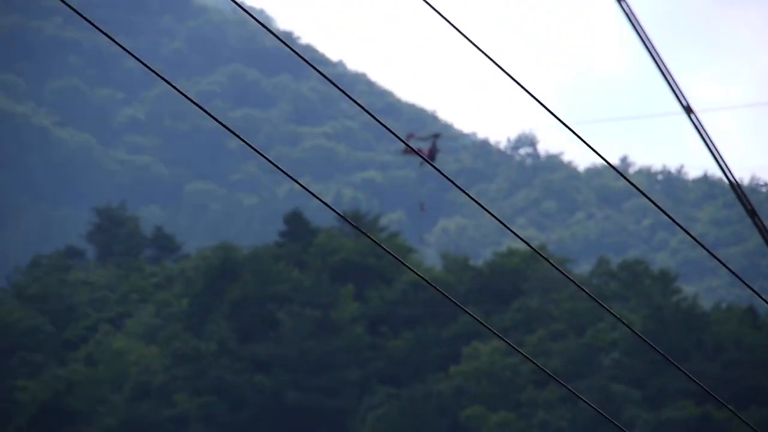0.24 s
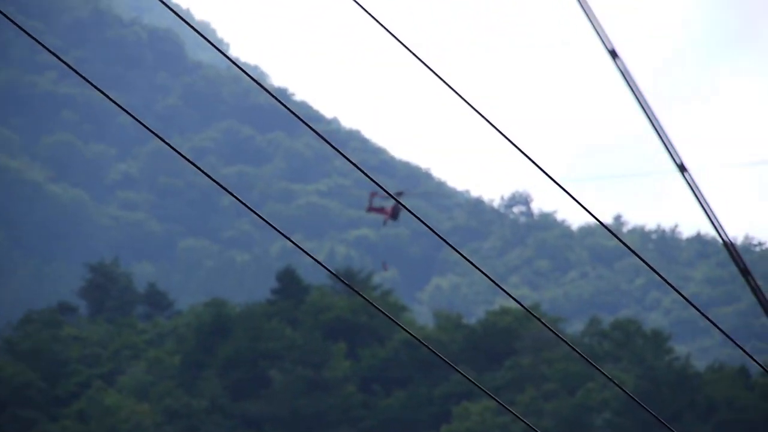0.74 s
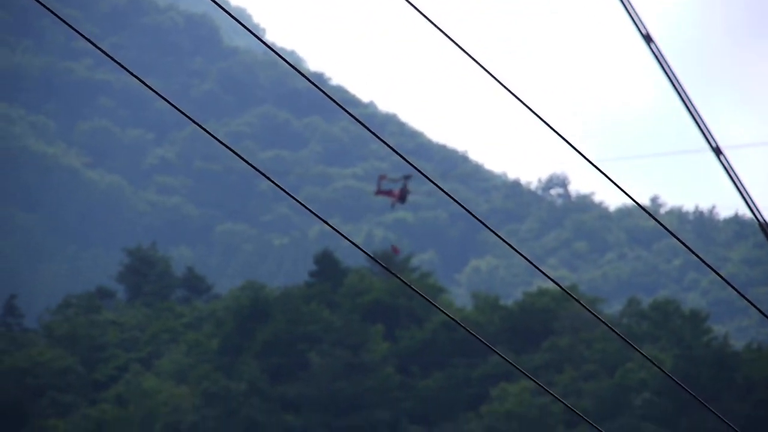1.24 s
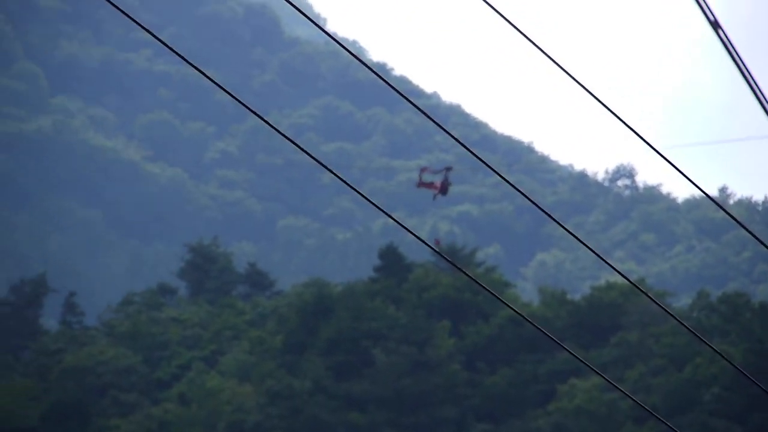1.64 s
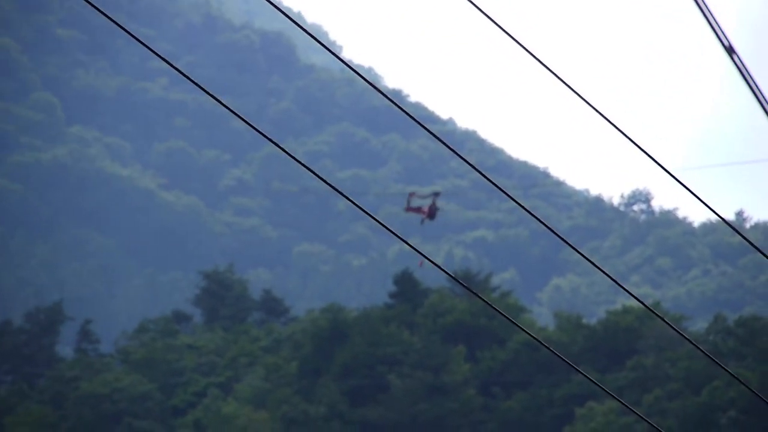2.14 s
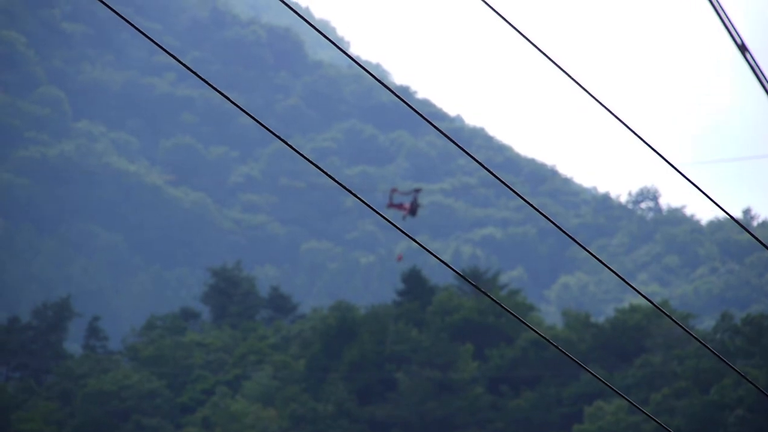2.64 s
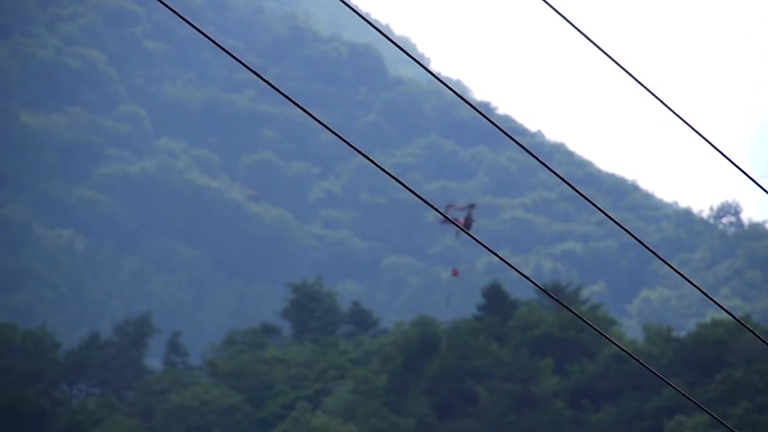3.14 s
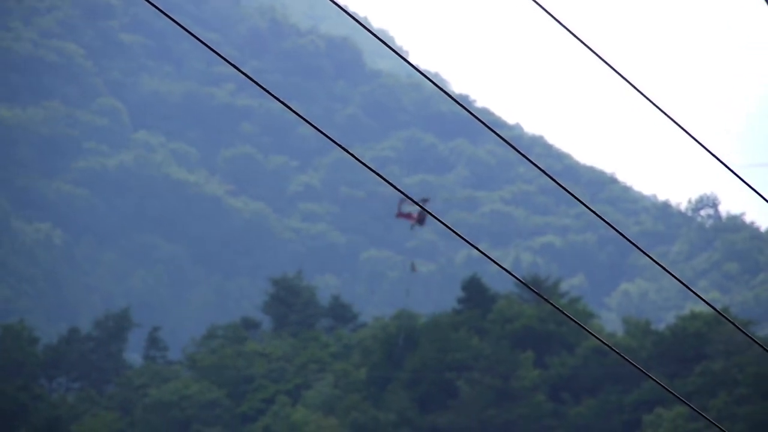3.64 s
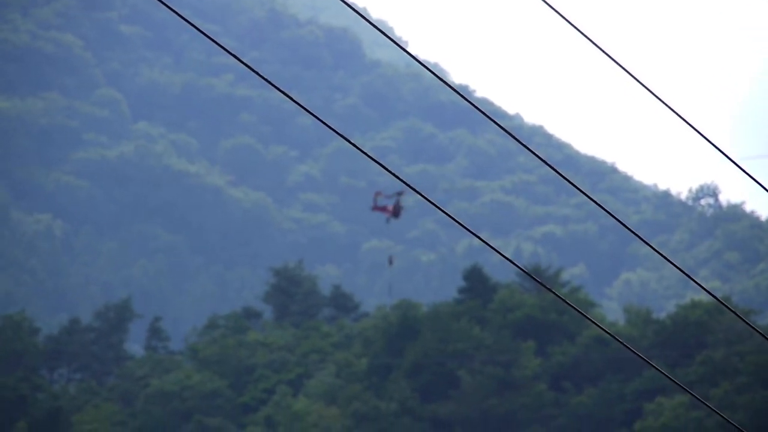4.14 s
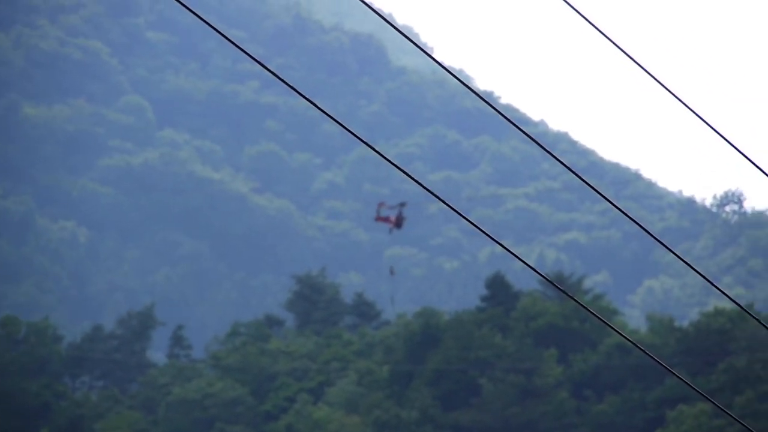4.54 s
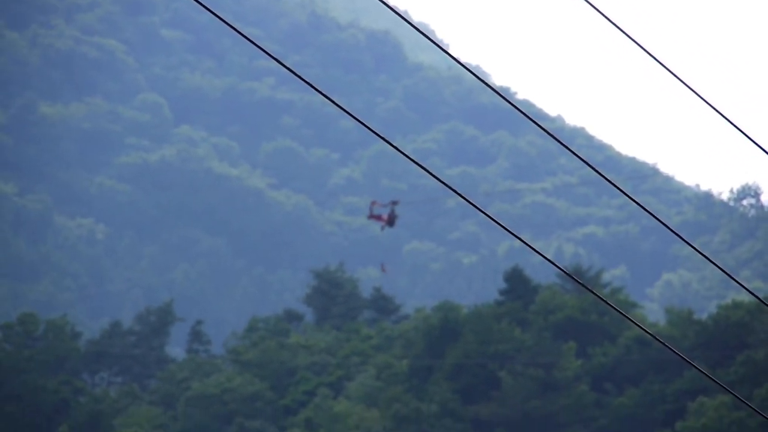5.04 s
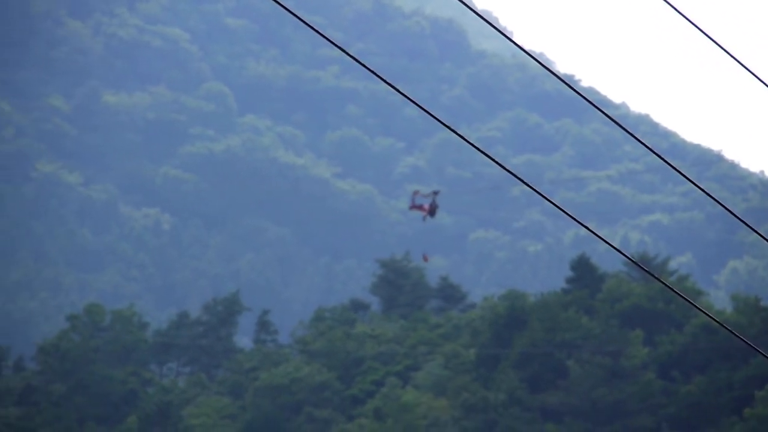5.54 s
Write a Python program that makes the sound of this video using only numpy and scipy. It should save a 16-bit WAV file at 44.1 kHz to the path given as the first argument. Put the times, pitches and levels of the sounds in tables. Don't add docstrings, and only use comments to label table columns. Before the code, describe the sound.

A diesel winch engine labours steadily close to the right, booming and roaring with a high pump whine, ticking valves and occasional loose metal clanks.

```python
import sys
import numpy as np
from scipy import signal
from scipy.fft import rfft, irfft
from scipy.io import wavfile

SR = 44100
rng = np.random.default_rng(int(sys.argv[2]) if len(sys.argv) > 2 else 0)


def pcm_store(signal):
    levels = np.round(np.clip(np.atleast_2d(signal), -1, 1) * 32767)
    wavfile.write(sys.argv[1], SR, levels.astype(np.int16).T)


def magnitude_from_level(level_db):
    exponent = np.asarray(level_db, float) / 20
    return 10 ** exponent


N = 255780
T = np.arange(N) / SR

# start_s, firing_hz
ENGINE_SPEED = [(0.0, 81.264), (1.16, 82.026), (2.32, 82.897), (3.48, 83.566), (4.64, 83.774),
                (5.8, 83.944)]
# start_s, level_db
WINCH_LOAD = [(0.0, 1.1), (0.53, 0.4), (0.74, 2.5), (0.83, 0.7), (1.37, 1.4), (1.45, 0), (1.95, 0.5),
              (2.44, 0.5), (2.55, -0.5), (2.61, 0.5), (3.56, -0.5), (3.85, 1.5), (4.09, -0.6), (4.35, 1.3),
              (4.89, -0.25), (5.34, -0.0), (5.48, 1), (5.8, 1)]
# crank_order (multiple of turn rate), level_db
EXHAUST_THUMP = [(2, -56.5), (4, -42), (5, -51), (7, -47), (11, -56.5), (12, -43.5), (13, -43), (14, -51),
                 (15, -50.5), (16, -42), (17, -51.5), (18, -38.5), (19, -46.5), (20, -52), (21, -45),
                 (24, -49), (25, -48)]
# crank_order (multiple of turn rate), level_db
BLOCK_KNOCK = [(28, -75), (29, -51.5), (31, -40), (32, -49.5), (33, -44), (34, -58.5), (35, -40),
               (36, -67.5), (38, -50), (39, -68), (56, -52.5), (58, -47), (61, -49), (63, -57), (89, -47),
               (91, -76.5), (123, -52.5)]
# pitch_hz, level_db (per Hz)
ROAR_COLOUR = [(30, -30), (50, -22.5), (70, -3.5), (130, -1.5), (220, -3.5), (300, -0.5), (380, 5.5),
               (460, 5), (560, -0.8), (730, -2.5), (850, 5.5), (980, 1.5), (1250, -2), (1500, 1.5)]
# pitch_hz, level_db (per Hz)
CLATTER_COLOUR = [(1500, -2.5), (1800, -1), (2150, -5), (2700, -3), (3300, -8.5), (4000, -14), (4600, -8),
                  (5200, -12), (5700, -18), (6500, -17), (7400, -23), (7800, -24.5), (9500, -35),
                  (10400, -48)]
# pitch_hz, level_db (per Hz)
FIZZ_COLOUR = [(4500, -48.5), (5700, -16), (6500, -14.5), (7400, -15.5), (7800, -25), (9500, -28.5),
               (10400, -44.5)]
# pitch_hz, t60_s, level_db
BLOCK_MODES = [(414, 0.022, -38.5), (644, 0.036, -36.5), (913, 0.048, -33), (1010, 0.027, -28),
               (1460, 0.013, -36.5), (1895, 0.018, -37)]
# pitch_hz, t60_s, level_db
COVER_MODES = [(3020, 0.0081, -46.5), (3760, 0.015, -45.5), (4030, 0.0093, -33.5), (4400, 0.028, -39),
               (5600, 0.0062, -34), (6710, 0.013, -42), (7420, 0.017, -44.5), (8700, 0.02, -50)]
# start_s, peak_db
HARD_TICKS = [(0.048, -30), (0.16, -31), (0.235, -23.5), (0.382, -24), (0.5287, -29), (0.602, -29),
              (1.042, -29), (1.0784, -24), (1.2979, -27), (1.7355, -28), (1.918, -27), (1.9899, -26),
              (2.0268, -33), (2.1715, -25), (2.3161, -27), (2.7856, -28), (2.822, -26), (3.0744, -27.5),
              (3.29, -25), (3.7209, -28), (3.8637, -30), (4.2582, -24), (4.4024, -32), (4.5093, -31),
              (5.2609, -28), (5.3702, -24.5), (5.44, -23), (5.4764, -26), (5.5473, -26)]
# start_s, peak_db, pitch_hz
HARD_TAPS = [(0.138, -34, 4230), (0.1607, -26, 3800), (1.276, -32, 4150), (1.8347, -32, 4180),
             (1.8951, -26, 4230), (1.9799, -25, 4020), (2.161, -27, 3910), (2.836, -30, 3890),
             (2.9926, -27, 3890), (3.0879, -34, 4150), (4.3081, -24, 3870), (4.344, -28, 4360),
             (4.5116, -24.5, 4120), (5.1437, -30, 4130), (5.167, -25, 4400), (5.3467, -40, 4090),
             (5.4784, -28, 3930), (5.562, -27, 3960), (5.597, -32, 3900)]
# start_s, peak_db
DRY_SNAPS = [(0.0523, -36), (0.615, -37), (0.7233, -33), (0.7891, -32), (3.1857, -40), (3.5324, -41),
             (3.83, -36), (3.8671, -32), (4.1769, -37), (4.2248, -40), (4.4608, -35), (4.6084, -33),
             (4.6389, -34), (4.6773, -32), (5.228, -39), (5.5264, -34)]
# start_s, peak_db, tilt_db (high modes up, low mode down)
PANEL_CLANKS = [
    (0.083, -23.5, 10),
    (0.21, -23, -2),
    (0.3404, -14, -2),
    (1.5914, -32, -6),
    (2.5002, -25, 9),
    (3.0086, -19.5, -1),
    (4.153, -20, -2.5),
    (4.6905, -19, -4.5),
    (5.1465, -22, 5),
    (5.4838, -15.5, 0),
]
# pitch_hz, half_width_hz, gain_db
PIPE_RESONANCES = [(162.6, .8, -9), (165.7, .5, -8), (167.7, 1.5, 8.3), (244.8, 1.9, 3.2)]
# pitch_hz, half_width_hz, gain_db
CASING_RESONANCES = [(842, 6.5, 10.5), (1638, 6, 0), (1668, 20, -4), (3266, 11, 18)]
PUMP_TONES = [-45.5, -43, -61.5]
# start_s, level_db
PUMP_WHINE = [(0.0, -38), (0.41, -33.5), (0.7, -35), (1.01, -34.5), (1.71, -38.5), (1.86, -30),
              (2.44, -33.5), (2.5, -37.5), (2.98, -35.5), (3.84, -35.5), (3.98, -33), (4.29, -33.2),
              (4.55, -36.5), (4.82, -34.0), (5.47, -37.6), (5.8, -34.5)]
# pitch_hz, direct_share (signed), lead_rad, other_face_db
FAR_MICROPHONE = [(30, 0.95, 0.18, -11.5), (200, 1.105, 0.14, -26), (600, 0.89, 0.19, -5),
                  (1270, 0.73, 0.36, -10.5), (1980, 0.31, .4, -16), (2550, 0.22, .4, -19),
                  (3260, -0.13, .2, -6.5), (4000, 0.28, 0.13, -16), (4450, -0.45, 0.032, -12),
                  (5200, 0.0022, 0.17, -10), (5700, -0.3, 0.12, -9), (6660, -0.18, 0, -17),
                  (8000, -0.14, 0.01, -6.5), (9300, -0.11, 0.0098, -18)]


def walk(rate):
    levels = rng.standard_normal(600)
    return 0.66 * np.interp(T * rate, np.arange(len(levels)), levels)


def along(table, column):
    hz = np.maximum(np.arange(N // 2 + 1) * SR / N, 1)
    values = np.array(table)
    return np.interp(np.log(hz), np.log(values[:, 0]), values[:, column])


def hiss(colour, gate, db):
    spectrum = rfft(rng.standard_normal(N) * gate)
    return magnitude_from_level(db) * irfft(spectrum * magnitude_from_level(along(colour, column=1)), N)


def tone(cycles, db):
    return np.sqrt(2) * magnitude_from_level(db) * np.cos(2 * np.pi * cycles)


def ring(blows, hz, t60):
    pole = np.exp(2j * np.pi * hz / SR - np.log(1000) / (t60 * SR))
    return signal.lfilter([1], [1, -pole], blows).imag


def blows_at(cycles, scatter_db):
    at = np.flatnonzero(np.diff(np.floor(cycles)))
    strength, lateness = rng.standard_normal((2, len(at)))
    late = (30 * abs(lateness)).astype(int)
    out = np.zeros(N)
    out[np.minimum(at + late, N - 1)] = magnitude_from_level(scatter_db * np.clip(strength, -2, 2))
    return out


def struck(events, t60, rise_s, gain_db):
    out = np.zeros(N + SR)
    t = T[:SR // 5]
    shape = (1 - np.exp(-t / rise_s)) * np.exp(-np.log(1000) * t / t60)
    for start_s, db, hz in events:
        out[int(start_s * SR):][:len(t)] += magnitude_from_level(db + gain_db) * shape * np.sin(2 * np.pi * hz * t)
    return out[:N]


def through(resonances, hz, db):
    lift = 1
    for centre, half_width, gain_db in resonances:
        lift = lift + magnitude_from_level(gain_db) / (1 + ((hz - centre) / half_width) ** 2)
    return db + 20 * np.log10(lift)


def loose_panel():
    low_blows = [(s, db - tilt_db, 1530) for s, db, tilt_db in PANEL_CLANKS]
    clank = struck(low_blows, 0.07, 0.0041, -1)
    for hz, gain_db in ((1800, -11.5), (2010, -6.5)):
        high_blows = [(s, db + tilt_db, hz) for s, db, tilt_db in PANEL_CLANKS]
        clank += struck(high_blows, 0.12, 0.0035, gain_db)
    shake = sum(magnitude_from_level(db) * np.exp(-((T - s - .008) / 0.003) ** 2) for s, db, _ in PANEL_CLANKS)
    rattle_colour = [(700, -24.0), (1100, -9.0), (2200, 1.5), (3200, -12), (4500, -31.5)]
    return clank + hiss(rattle_colour, shake, 1.5)


def injector_snap(firing):
    blows = magnitude_from_level(-26.5) * blows_at(firing - .45, 7.0)
    hard_at = [int(s * SR) for s, _ in DRY_SNAPS]
    blows[hard_at] += magnitude_from_level(np.array(DRY_SNAPS)[:, 1] + 23.5)
    t = T[:SR // 100]
    crack = rng.standard_normal(len(t)) * np.exp(-t / 0.0021)
    clicks = np.convolve(blows, crack)[:N]
    return irfft(rfft(clicks) * magnitude_from_level(along(FIZZ_COLOUR, column=1) + 6.5), N)


def valve_gear(firing):
    taps = struck(HARD_TAPS, 0.012, 0.00064, 6.0)
    for hz, t60, db in COVER_MODES:
        taps += magnitude_from_level(db) * ring(blows_at(firing - .45, 4.5), hz, t60)
    lift = blows_at(firing / 3 - .455, 4.1)
    tappet = magnitude_from_level(-35.5) * ring(lift, 4900, 0.011) + magnitude_from_level(-35.0) * ring(lift, 5300, 0.013)
    upper = [(s, db, 4980 + 100 * rng.standard_normal()) for s, db in HARD_TICKS]
    lower = [(s, db, hz * .93) for s, db, hz in upper]
    hard = struck(upper, 0.0098, 0.00094, 10.7) + struck(lower, 0.0082, 0.00083, 6.6)
    return taps + tappet + hard


def combustion(firing):
    rap = blows_at(firing - .5, 3.2)
    return sum(magnitude_from_level(db + 4.9 * walk(40)) * ring(rap, hz, t60) for hz, t60, db in BLOCK_MODES)


def engine_block(firing, faces):
    effort_db = np.interp(T, *np.transpose(WINCH_LOAD))
    puff = np.cos(2 * np.pi * (firing - .56))
    roar_db = (1.0 + 1.2 * walk(40)) * puff + 0.65 * walk(20) + 0.33 * walk(5.2) + 0.58 * effort_db
    clatter_db = (0.5 + 0.63 * walk(40)) * puff + 1.23 * walk(14) + 0.89 * effort_db
    fizz_db = (0.5 + 1.5 * walk(50)) * puff + 3.5 * walk(14) + 1.6 * effort_db
    noises = []
    for _ in range(faces):
        roar = hiss(ROAR_COLOUR + [(1700, -41)], magnitude_from_level(roar_db), -17)
        clatter = hiss([(1300, -45)] + CLATTER_COLOUR, magnitude_from_level(clatter_db), -17.0)
        fizz = hiss(FIZZ_COLOUR, magnitude_from_level(fizz_db), -22.5)
        noises.append(roar + clatter + fizz)
    return noises


def pump(firing, hz):
    first, second, fourth = (through(CASING_RESONANCES, 10 * k * hz, db) + 0.53 * walk(6.5)
                             for k, db in zip((1, 2, 4), PUMP_TONES))
    third = np.interp(T, *np.transpose(PUMP_WHINE))
    whine = np.zeros(N)
    for k, db in enumerate([first, second, third, fourth], start=1):
        whine += tone(10 * k * firing + .055 * walk(25), db + 1.13 * walk(30))
    return whine


def uneven_cylinders(orders, turn):
    out = np.zeros(N)
    for k, db in orders:
        cycles = k * turn + 0.11 * rng.standard_normal() + 0.084 * walk(6)
        out += tone(cycles, db + 3.0 * walk(7))
    return out


def exhaust(firing, hz):
    octave_db = through(PIPE_RESONANCES, 2 * hz, -38.5)
    third_db = through(PIPE_RESONANCES, 3 * hz, -45) + 2.0 * walk(4.6)
    boom = tone(firing, -20.5 + 0.51 * walk(9.2))
    boom -= tone(2 * firing, octave_db + 0.077 * walk(12))
    return boom + tone(3 * firing - .11, third_db)


def firing_count(hz):
    first_crest_s, period_s, swing_cycles = 2.92, .66, .014
    since_crest = T - first_crest_s
    fade_in = np.clip(since_crest + period_s / 2, 0, period_s / 2) * 2 / period_s
    hunt = fade_in * np.cos(2 * np.pi * since_crest / period_s)
    return .232 + np.cumsum(hz) / SR + swing_cycles * hunt


def scene():
    hz = np.interp(T, *np.transpose(ENGINE_SPEED))
    firing = firing_count(hz)
    turn = firing / 3
    front, back = engine_block(firing, faces=2)
    ticks = valve_gear(firing)
    near = loose_panel() + injector_snap(firing) + ticks + combustion(firing) + front
    near += pump(firing, hz) + exhaust(firing, hz)
    near += uneven_cylinders(EXHAUST_THUMP, turn - .85) + uneven_cylinders(BLOCK_KNOCK, turn - .5)
    back = back + np.roll(ticks, int(.003 * SR))
    direct = along(FAR_MICROPHONE, column=1) * np.exp(1j * along(FAR_MICROPHONE, column=2))
    other_face = magnitude_from_level(along(FAR_MICROPHONE, column=3))
    far = irfft(rfft(near) * direct + rfft(back) * other_face, N)
    return np.array([far, near])


def band_limit(x):
    return signal.sosfilt(signal.butter(12, 10390, fs=SR, output="sos"), x)


def record(dry):
    bass_cut = signal.butter(2, 35, "high", fs=SR, output="sos")
    treble_cut = signal.butter(6, 10900, fs=SR, output="sos")
    mix = signal.sosfiltfilt(np.vstack([bass_cut, treble_cut]), dry)
    return band_limit(mix)


dry = scene()
out = record(dry)
pcm_store(out)
```